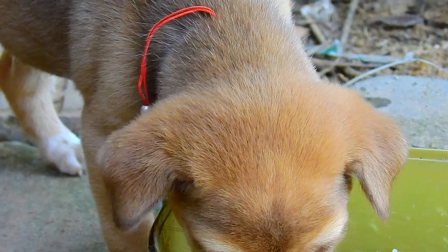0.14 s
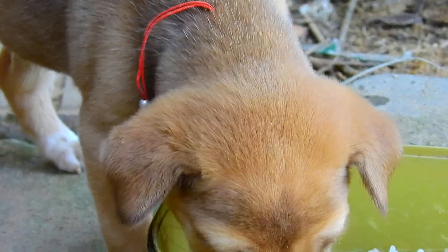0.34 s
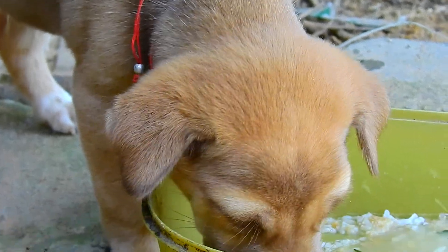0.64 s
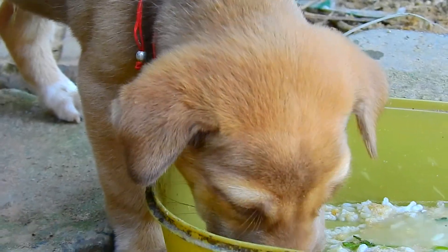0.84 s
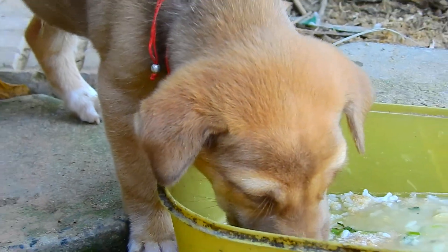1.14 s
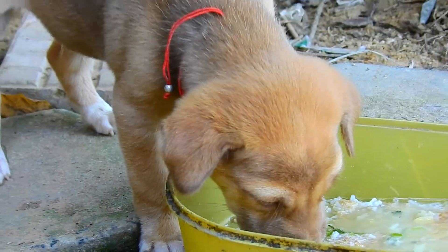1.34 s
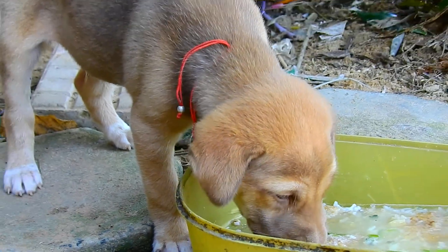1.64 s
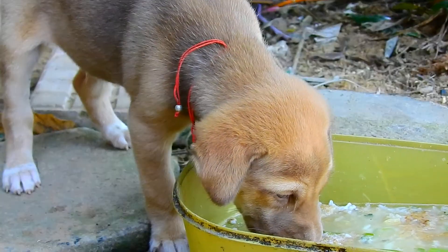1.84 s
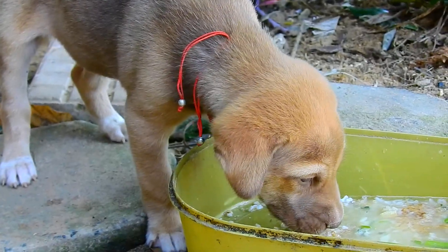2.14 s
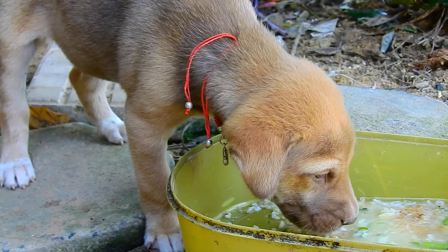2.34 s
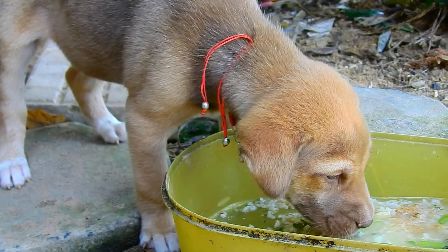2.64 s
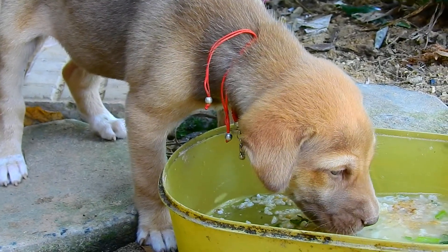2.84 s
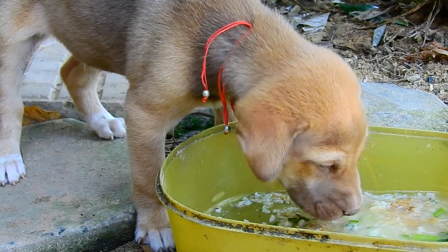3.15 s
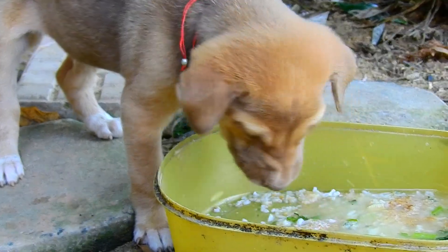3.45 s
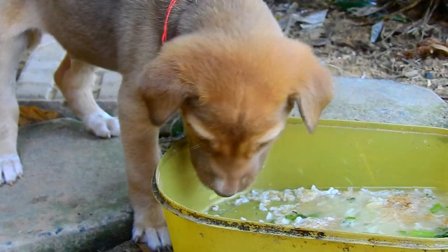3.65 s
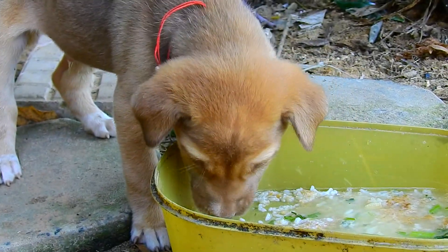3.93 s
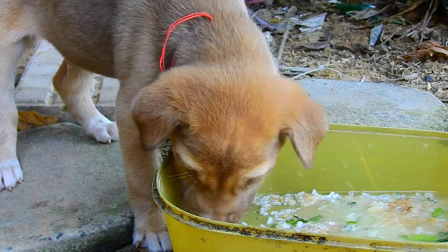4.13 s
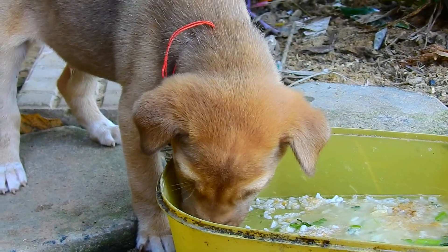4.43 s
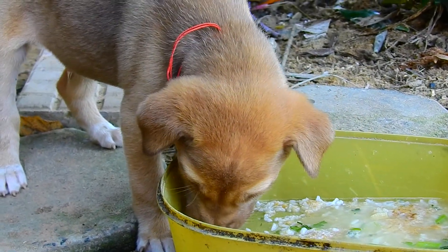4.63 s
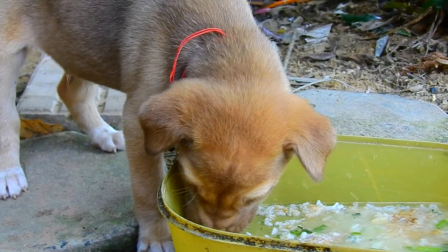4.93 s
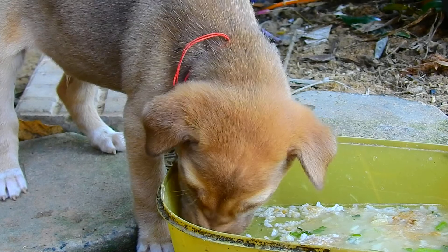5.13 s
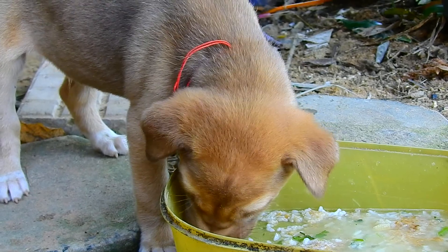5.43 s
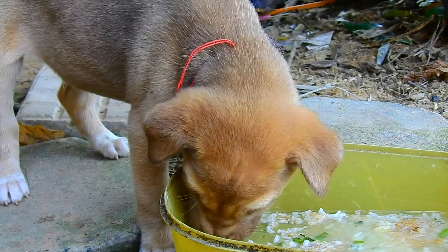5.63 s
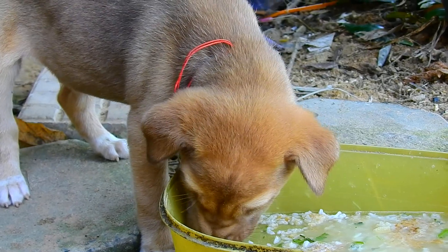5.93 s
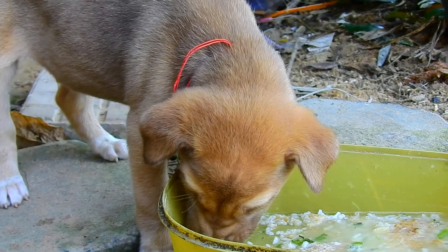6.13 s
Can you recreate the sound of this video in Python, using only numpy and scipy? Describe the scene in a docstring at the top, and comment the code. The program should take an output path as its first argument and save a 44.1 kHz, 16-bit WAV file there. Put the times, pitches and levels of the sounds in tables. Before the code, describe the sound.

Close up, a puppy laps and smacks at watery rice in a plastic tub, with wet slurps, fizzing squirts, scrapes and hollow bumps.

```python
"""A puppy eats watery rice from a plastic tub in a yard: tongue strokes, each a spatter of tiny bubbles
in a resonant hollow, over fizz, slosh and gurgle built from random bursts. Squirts hiss, squeaks and
pops are narrower spatters, lips snap as short rings. The tub rings in decaying modes when pushed, and
rasps and hums when scraped over concrete. Behind lie a far rumble of shaped noise and a wavering tone.
"""
import sys
import numpy as np
from scipy import signal
from scipy.fft import rfft, irfft
from scipy.io import wavfile
from scipy.ndimage import uniform_filter1d

SR = 44100
rng = np.random.default_rng(int(sys.argv[2]) if len(sys.argv) > 2 else 0)


def unload_wav(signal):
    """Save mono or channel-first audio to the path in sys.argv[1] as 16-bit WAV at rate SR, clipped to [-1, 1]."""
    wavfile.write(
        sys.argv[1],
        SR,
        np.round(np.clip(np.atleast_2d(signal).T, -1, 1) * 32767).astype(np.int16),
    )


N = 276948  # samples

# wet rice stirred by the muzzle: time_s, fizz_db, slosh_db, gurgle_db
STIRRING = [(.08, -36, -35.5, -46), (.3, -38, -48, -49.5), (.6, -35, -39.5, -49), (.88, -26, -44, -44.5),
            (1.12, -23, -34.5, -46.5), (1.45, -30, -41, -46.5), (2.0, -36, -48, -48),
            (2.7, -38.5, -50, -51), (2.8, -35, -34.5, -65), (3.14, -32, -35.5, -54),
            (3.3, -35.5, -45, -44.5), (3.76, -35, -37, -46.5), (3.92, -27.5, -34, -54),
            (4.14, -28.5, -38, -44.5), (4.25, -21, -25, -41), (4.42, -22.5, -39, -42.5),
            (4.75, -33.5, -44.5, -53), (5.05, -37, -42.5, -47.5), (5.8, -39.5, -44.5, -52),
            (5.97, -28, -34, -33), (6.15, -35.5, -39.5, -43), (6.28, -32, -38, -47)]
# fine bubbles through the microphone port: freq_hz, density_db (per Hz, relative)
FIZZ_SPECTRUM = [(2060, -28), (3500, -17.5), (3940, -14), (5520, -7), (6660, 0), (7450, -3), (9630, -18.5),
                 (15600, -43)]
# coarse bubbles: freq_hz, density_db (per Hz, relative)
SLOSH_SPECTRUM = [(300, -10.5), (800, -3.5), (1500, -1.5), (2500, 2.5), (3800, 3), (5000, 2.5), (7000, -22),
                  (15000, -70)]
# hissing squirts of water between the teeth: start_s, level_db (before dulling), length_s
SQUIRTS = [(0.098, -37.5, 0.16), (0.274, -30.5, 0.018), (0.528, -33.5, 0.018), (0.684, -27.5, 0.042),
           (0.847, -28, .047), (0.927, -29, 0.051), (1.126, -31, 0.087), (1.538, -27, 0.026),
           (1.63, -59, 0.033), (1.73, -34, 0.11), (1.91, -20.5, 0.047), (2.046, -27, 0.08),
           (2.115, -34.5, 0.065), (2.221, -25.5, 0.061), (2.387, -40, .04), (2.486, -48, 0.025),
           (2.586, -42, .05), (3.336, -26, .035), (3.502, -30.5, 0.027), (3.635, -28, 0.024),
           (3.899, -20, 0.044), (3.965, -21.5, 0.027), (4.051, -20, 0.042), (4.155, -32, 0.045),
           (4.232, -24, .029), (4.285, -21.5, 0.02), (4.413, -28.5, .037), (4.48, -24, 0.054),
           (4.57, -27, 0.056), (4.725, -31, 0.043), (4.842, -24, 0.022), (5.119, -32.5, 0.1),
           (5.255, -29, 0.12), (5.45, -28.5, 0.049), (5.483, -24, 0.042), (5.548, -24.5, 0.035),
           (5.664, -32.5, 0.092), (5.774, -34, 0.013)]
# far rumble: freq_hz, density_db (per Hz, relative)
YARD_SPECTRUM = [(12, -44), (20, -20), (69, 3), (135, 4), (166, 2), (264, -16.5), (318, -26), (484, -21.5),
                 (561, -13), (768, -25.5), (988, -16), (1930, -23), (3000, -16.5), (3900, -44),
                 (6600, -120)]
# tongue strokes: start_s, level_db, mouth_resonance_hz, length_s,
# resonance_glide_factor (above 1 rises, below 1 falls)
TONGUE_STROKES = [(0.088, -32, 1950, 0.04, 1.1), (0.664, -23, 2630, 0.051, 1.1),
                  (0.763, -18.5, 3580, 0.054, 1.1), (0.842, -23.5, 2430, 0.077, 1.2),
                  (1.066, -21.5, 2650, 0.049, 1.3), (1.201, -20.5, 4330, 0.061, 9.8),
                  (1.322, -16.5, 4330, 0.024, 1.1), (1.483, -29, 2310, 0.039, 1),
                  (1.582, -29, 4470, 0.043, 1.4), (1.6194, -15, 3040, 0.042, 0.99),
                  (1.756, -18.5, 2360, 0.028, 1.1), (1.779, -23, 4400, 0.035, 0.97),
                  (1.895, -28, 3500, 0.036, 2.1), (2.029, -29, 3180, 0.04, 1.3),
                  (2.216, -21.5, 2620, 0.06, 1.85), (2.365, -27.5, 2520, 0.022, 0.91),
                  (2.476, -25, 2770, 0.029, 3), (2.578, -27, 2060, 0.048, 4.1),
                  (2.77, -35, 3800, 0.043, 1.4), (2.893, -23, 4570, 0.044, 1.4),
                  (3.312, -30, 2300, 0.058, 0.95), (3.488, -24.5, 2960, 0.024, 2.1),
                  (3.612, -27, 3350, 0.035, 1.8), (3.641, -23.5, 2440, 0.038, 1.8),
                  (3.811, -28, 1850, 0.11, 1.6), (3.856, -19, 3720, 0.062, 1.4),
                  (3.93, -27, 2420, 0.043, 0.98), (3.979, -16, 2960, 0.022, 2), (4.185, -18, 3920, 0.05, 2),
                  (4.831, -20, 3750, 0.039, 2.1), (4.846, -11.5, 4970, 0.045, 1.3),
                  (5.026, -38, 4070, 0.022, 1.1), (5.111, -23.5, 3670, 0.056, 0.67),
                  (5.5, -38, 3960, 0.04, 1), (5.67, -30, 1840, 0.091, 1.1), (5.888, -26.5, 2700, 0.02, 1.3),
                  (5.965, -31, 1580, 0.03, 1.3), (6.059, -25.5, 2580, 0.019, 1.2)]
# tub scraped over concrete: start_s, hold_s, rasp_db, drone_db
SCRAPES = [(0.104, 0.026, -56, -38), (2.379, 0.021, -69, -31.5), (2.454, 0.042, -50, -36.5),
           (2.737, 0.027, -32, -46), (2.8, 0.04, -37.5, -41), (2.859, 0.075, -30.5, -39),
           (2.973, 0.069, -29.5, -30), (3.084, 0.055, -44, -40), (4.19, 0.11, -49, -61),
           (5.26, 0.035, -39.5, -52), (5.456, 0.021, -42.5, -33.5), (5.875, 0.054, -32.5, -34.5),
           (5.926, 0.036, -28.5, -32), (6.032, 0.009, -28.5, -40), (6.065, 0.01, -39.5, -27),
           (6.107, 0.036, -37.5, -35), (6.175, .04, -35.5, -37)]
# tub modes: freq_hz, level_db, t60_s (at damping 1)
TUB_MODES = [(176, -8.5, 0.065), (281, -19, 0.081), (376, -12, 0.054), (471, -22, 0.1), (695, -21, 0.05),
             (970, -25, 0.06)]
# rim on concrete: freq_hz, density_db (per Hz, relative)
GRIT_SPECTRUM = [(150, -15), (350, 3), (800, -1.5), (1600, -6.5), (3500, -38), (8000, -16), (15000, -85)]
# longer, narrower wet squeaks: start_s, level_db, pitch_hz, length_s, glide_factor
SQUEAKS = [(.124, -36.5, 1116, 0.041, 0.97), (.73, -37, 590, 0.025, 1.25), (2.489, -43.5, 930, 0.16, 0.91),
           (3.08, -36, 1400, 0.062, 0.84), (3.2495, -41, 2420, 0.053, 0.9), (3.344, -37, 746, .035, 0.61),
           (3.385, -35, 516, 0.037, 1.26), (3.412, -37.5, 1390, 0.02, 0.96),
           (3.434, -33.5, 900, 0.031, 1.27), (3.483, -42, 1000, 0.041, 0.89), (3.595, -37, 860, .03, 1.02),
           (3.765, -36, 680, .026, 1.37), (3.839, -31, 650, 0.017, 0.88), (4.23, -34.5, 539, 0.074, 1.05),
           (4.35, -35, 560, 0.042, 1.02), (4.907, -34.5, 1540, 0.019, 1.1), (5.4735, -38, 3920, 0.11, 1.02),
           (5.647, -39, 1420, .036, 1.07), (5.6544, -35, 2470, .036, 1.1), (6.1923, -36, 2130, 0.041, 1.06)]
# bubbles and smacks: start_s, level_db, pitch_hz, length_s
POPS = [(0.278, -25, 1110, 0.009), (0.345, -27.5, 2170, 0.013), (0.386, -34, 2300, 0.032),
        (1.651, -30, 920, 0.015), (1.809, -29, 1040, 0.012), (1.869, -25.5, 1030, 0.018),
        (1.916, -27, 900, 0.016), (1.919, -26.5, 905, 0.024), (2.216, -28, 1010, 0.013),
        (2.573, -29, 2180, 0.018), (2.673, -27.5, 1040, 0.0073), (3.563, -28, 945, 0.021),
        (3.625, -23.5, 910, 0.027), (3.722, -18.5, 1420, 0.018), (3.822, -23, 1310, 0.013),
        (3.884, -25, 1520, 0.014), (4.634, -29.5, 1080, 0.013), (4.721, -29.5, 1070, 0.014),
        (4.836, -27, 1330, 0.0098), (4.961, -30, 1260, 0.0056), (5.2, -27.5, 1220, 0.0091),
        (5.234, -25, 1410, 0.014), (5.53, -31, 1310, 0.019), (5.69, -30.5, 1220, 0.029),
        (5.967, -23, 1330, 0.009), (6.028, -17, 1180, 0.0075), (6.046, -25, 784, 0.016),
        (6.148, -25, 1230, 0.0086)]
# low turns of the far tone: time_s, pitch_hz, level_db
WHISTLE_DIPS = [(.86, 945, -56), (1.085, 915, -40), (1.315, 925, -42), (1.52, 920, -40), (1.67, 922, -43),
                (1.82, 885, -62)]
# pushes against the tub: start_s, level_db, damping_factor
BUMPS = [(0.868, -15.5, 4.8), (1.984, -18.5, 1.4), (2.391, -34, 0.97), (2.461, -17.5, 0.51),
         (2.755, -23, 1.1), (2.895, -18, 0.59), (2.977, -13, .71), (3.02, -8.5, 1.2), (3.043, -6, 1.6),
         (4.127, -27.5, 1.5), (4.362, -25, 0.91), (5.272, -15.5, 2.1), (5.89, -19, 1.1), (6.06, -1, 0.53),
         (6.185, -12, 1.5), (6.208, -14, 2.5)]
# lip snaps: start_s, level_db, pitch_hz
LIP_SNAPS = [(1.628, -24, 3400), (3.722, -22, 5000), (4.2724, -19, 6600), (4.2921, -16, 6600),
             (4.9154, -15.5, 3520), (4.9247, -16, 4200), (5.2829, -13, 6400), (5.292, -14, 4170),
             (5.3026, -9.5, 5770)]
# likeness of the two ports: freq_hz, correlation (0 to 1)
PORT_LIKENESS = [(30, .68), (60, .86), (130, .985), (300, .96), (700, .87), (1500, .83), (3100, .74),
                 (6800, .44), (10000, .3), (15000, .5)]
# phase by which the left port leads: freq_hz, lead_rad
PORT_LEAD = [(0, 0), (1000, .05), (5000, .3), (7750, .8), (9650, 2.6), (11300, 3.1), (15300, 3.8)]
# left over right: freq_hz, balance_db
PORT_BALANCE = [(60, -0.5), (250, -1.4), (1000, 1), (4000, .6), (9000, -0.4)]

WAKE_FIZZ_DB, WAKE_SLOSH_DB = -26.5, -22.5  # re stroke level
WAKE_RISE_S, WAKE_LENGTH_S = 0.014, 0.048
WAKE_SLOSH_DB_PER_OCTAVE = -13.5  # high mouth resonances slosh less; 0 dB at 2500 Hz
SQUIRT_TOP_HZ, SQUIRT_RISE_S = 9200, 0.002  # duller than the fizz
YARD_DB = -39.5
STROKE_CREST_DB, POP_CREST_DB, SQUEAK_CREST_DB = 12, 10, 3  # nominal peak over mean
SCRAPE_RISE_S, SCRAPE_FALL_S = 0.01, 0.032
WHISTLE_LIFT_HZ, WHISTLE_FADE_DB = 40, -5  # climbs and fades between dips
SNAP_RISE_S, SNAP_DECAY_S = 0.0001, 0.0003
START_S, START_RAMP_S = 0.07, 0.011
BAND_EDGE_HZ = 15600


def gain_of(db):
    """Decibels to amplitude gain."""
    return 10 ** (np.asarray(db) / 20)


def evened(x):
    """Scales to rms 1."""
    return x / np.sqrt(np.mean(x ** 2) + 1e-20)


def smoothed(x, width):
    """Two running means, width in samples."""
    return uniform_filter1d(uniform_filter1d(x, width), width)


def read(points, hz):
    """Interpolates a table on a log-frequency axis."""
    table_hz, value = np.transpose(points)
    return np.interp(np.log(hz + 1), np.log(table_hz + 1), value)


def add(mix, start_s, sound):
    """Adds a sound in place, cut at the end of the mix."""
    part = mix[..., round(start_s * SR):][..., :sound.shape[-1]]
    part += sound[..., :part.shape[-1]]


def coloured(x, spectrum):
    """Filters x by a spectrum table, rms 1."""
    gain = gain_of(read(spectrum, np.fft.rfftfreq(len(x), 1 / SR)))
    return evened(irfft(rfft(x) * gain, len(x)))


def resonate(x, hz, width_hz):
    """Moving resonance of gain 1: shifts hz down to zero, smooths, shifts back."""
    turn = np.exp(2j * np.pi * np.cumsum(hz * np.ones(len(x))) / SR)
    pole = np.exp(-np.pi * width_hz / SR)
    baseband = signal.lfilter([1 - pole], [1, -pole], x / turn + 1e-18)
    return 2 * (turn * baseband).real


def crackle(count, per_s, spread_db, clump_db, clump_s):
    """Random impulses of uneven size that come in clumps, rms 1."""
    size = gain_of(spread_db * np.minimum(rng.exponential(1, count), 4)) * rng.choice([-1., 1.], count)
    clumps = evened(smoothed(rng.standard_normal(count), max(round(clump_s * SR), 1)))
    struck = rng.random(count) < per_s / SR
    return evened(size * struck * gain_of(clump_db * clumps))


def burst(length_s, rise_s):
    """Time axis and envelope: quick rise, slower fall, peak 1."""
    t = np.arange(round(4 * length_s * SR) + 64) / SR
    shape = (1 - np.exp(-t / rise_s)) * np.exp(-(t / length_s) ** 2.47)
    return t, shape / shape.max()


def spatters(rows, per_s, rise_s, width_share, glide=None):
    """Bursts of tiny bubbles, each in a hollow whose resonance glides by a factor."""
    out = np.zeros(N)
    for start_s, level_db, hz, length_s, *own_glide in rows:
        t, shape = (part[:8192] for part in burst(length_s, rise_s))
        spatter = crackle(8192, per_s, 3.0, 0.61, 0.0011)[:len(t)]
        spatter[round(rise_s * SR)] += 12  # a stronger impulse marks the onset
        factor = glide or own_glide[0]
        centre_hz = np.clip(hz * factor ** (t / length_s - 0.5), 300, 9000)
        width_hz = width_share * hz
        once = resonate(spatter, centre_hz, width_hz)
        twice = evened(resonate(once, centre_hz, width_hz))
        add(out, start_s, gain_of(level_db) * shape * twice)
    return out


def stirred(column, wake_db=None, tilt_db=0):
    """Gain of one bubble layer: slow stirring, plus a wake per tongue stroke if wake_db is given."""
    rows = np.array(STIRRING)
    level = gain_of(np.interp(np.arange(N) / SR, rows[:, 0], rows[:, column]))
    wake = burst(WAKE_LENGTH_S, WAKE_RISE_S)[1]
    for start_s, level_db, hz, *_ in TONGUE_STROKES if wake_db else []:
        tilt = tilt_db * np.log2(hz / 2500)
        add(level, start_s, gain_of(level_db + wake_db + tilt) * wake)
    return level


def patchy(x, patch_db):
    """Random gain patches over frequency and time make the noise uneven, rms 1."""
    z = signal.stft(x, nperseg=512, noverlap=384)[2]
    patches = rng.standard_normal(z.shape[::-1]).T
    patches = uniform_filter1d(patches, size=3, axis=0)  # over frequency
    patches = evened(uniform_filter1d(patches, size=12, axis=1))  # over time
    return evened(signal.istft(z * gain_of(patch_db * patches), nperseg=512, noverlap=384)[1][:N])


def fizz_and_slosh():
    """Fine and coarse bubbles follow the stirring; squirts are a dulled swell of the fine ones."""
    fine_level = stirred(column=1, wake_db=WAKE_FIZZ_DB)
    coarse_level = stirred(column=2, wake_db=WAKE_SLOSH_DB, tilt_db=WAKE_SLOSH_DB_PER_OCTAVE)
    squirt_level = np.zeros(N)
    for start_s, level_db, length_s in SQUIRTS:
        add(squirt_level, start_s, gain_of(level_db) * burst(length_s, SQUIRT_RISE_S)[1])
    low = crackle(N, 14000, 3.4, 1.64, 0.022)
    high = crackle(N, 14000, 0.6, 3.1, 0.021)
    top = signal.butter(4, 8000, "high", fs=SR, output="sos")
    blend = low + signal.sosfiltfilt(top, high - low)  # the finest bubbles clump on their own
    fine = patchy(coloured(blend, FIZZ_SPECTRUM), 2.6)
    coarse = patchy(coloured(crackle(N, 7000, 1.9, 1.2, 0.015), SLOSH_SPECTRUM), 3.9)
    dull = signal.sosfiltfilt(signal.butter(1, SQUIRT_TOP_HZ, fs=SR, output="sos"), fine)
    return fine * fine_level + dull * squirt_level + coarse * coarse_level


def gurgle():
    """Random bubbles ring for a few cycles with rising pitch, large ones low, small ones high."""
    out = np.zeros(N)
    for hz in np.geomspace(280, 2200, 14):
        cycles = hz * np.arange(2000) / SR
        tone = np.sin(2 * np.pi * cycles * (1 + 0.01245 * cycles))
        bubble = tone * np.exp(-cycles / 5.2) * (1 - np.exp(-cycles / 0.067))
        strikes = crackle(N, 40, 3.0, 2.5, 0.02)
        out += (hz / 600) ** 0.3 * signal.oaconvolve(strikes, bubble)[:N]
    return stirred(column=3) * evened(out)


def yard():
    """Far low rumble: shaped noise that swells a little."""
    swell = evened(smoothed(rng.standard_normal(N), 4000))
    return gain_of(YARD_DB + 0.55 * swell) * coloured(rng.standard_normal(N), YARD_SPECTRUM)


def tongue_strokes():
    """Wide-band spatters in the mouth resonance."""
    return gain_of(-STROKE_CREST_DB) * spatters(TONGUE_STROKES, 6000, 0.0026, 0.37)


def scraping():
    """Gains of rasp and drone: each shove rises, holds and dies away."""
    out = np.zeros((2, N))
    for start_s, hold_s, rasp_db, drone_db in SCRAPES:
        t = np.arange(0, SCRAPE_RISE_S + hold_s + 4 * SCRAPE_FALL_S, 1 / SR)
        rise = np.minimum(t / SCRAPE_RISE_S, 1) ** 2
        fall = np.exp(-(np.maximum(t - SCRAPE_RISE_S - hold_s, 0) / SCRAPE_FALL_S) ** 2)
        add(out, start_s, gain_of([[rasp_db], [drone_db]]) * rise * fall)
    return out


def ring(damping):
    """Decaying modes of the tub, more or less damped by ground and muzzle."""
    t = np.arange(SR // 4) / SR
    return sum(gain_of(db - 60 * damping * t / t60_s) * np.sin(2 * np.pi * hz * t)
               for hz, db, t60_s in TUB_MODES)


def scrape_rasp():
    """Stick-slip over grit rasps and rings the tub."""
    slips = crackle(N, 1800, 0.39, 1.96, 0.012)
    boom = evened(signal.oaconvolve(np.diff(slips, prepend=0), ring(0.48))[:N])
    grit = coloured(slips, GRIT_SPECTRUM)
    return scraping()[0] * (gain_of(-11) * boom + gain_of(-3) * grit)


def scrape_drone():
    """While it scrapes, the tub hums near its lowest mode with a wavering pitch."""
    waver = evened(smoothed(rng.standard_normal(N), 900))
    pitch_hz = 165 + 4.28 * waver
    return scraping()[1] * np.sqrt(2) * np.sin(2 * np.pi * np.cumsum(pitch_hz) / SR)


def squeaks():
    """Wet squeaks: spatters in a narrow gliding resonance."""
    return gain_of(-SQUEAK_CREST_DB) * spatters(SQUEAKS, 3000, 0.00283, 0.085)


def bubble_pops():
    """Bubbles and smacks: short spatters of slightly rising pitch."""
    return gain_of(-POP_CREST_DB) * spatters(POPS, 2500, 0.00093, 0.3, glide=1.08)


def whistle():
    """A faint far tone wavers, fading as it climbs between dips, and is blurred by the air."""
    dip_s, dip_hz, dip_db = np.transpose(WHISTLE_DIPS)
    t, out = np.arange(dip_s[0], dip_s[-1], 1 / SR), np.zeros(N)
    lift = np.sin(np.pi * np.interp(t, dip_s, np.arange(len(dip_s)))) ** 2  # 0 at dips, 1 midway
    pitch_hz = np.interp(t, dip_s, dip_hz) + WHISTLE_LIFT_HZ * lift
    tone = np.sqrt(2) * np.sin(2 * np.pi * np.cumsum(pitch_hz) / SR)
    blur = evened(resonate(rng.standard_normal(len(t)), pitch_hz, 21))
    level = gain_of(np.interp(t, dip_s, dip_db) + WHISTLE_FADE_DB * lift)
    add(out, dip_s[0], (0.8 * tone + 0.25 * blur) * level * signal.windows.tukey(len(t), 0.1))
    return out


def tub_bumps():
    """Short pushes ring the tub; the deep bass below about 115 Hz is filtered away."""
    out, t = np.zeros(N), np.arange(2000) / SR
    push = t * np.exp(-2 * np.pi * 600 * t)
    for start_s, level_db, damping in BUMPS:
        add(out, start_s, -gain_of(level_db) * signal.oaconvolve(push / push.sum(), ring(damping)))
    return signal.sosfilt(signal.butter(4, 115, "high", fs=SR, output="sos"), out)


def lip_snaps():
    """Bare clicks with a very short ring."""
    out, t = np.zeros(N), np.arange(400) / SR
    shape = np.exp(-t / SNAP_DECAY_S) * (1 - np.exp(-t / SNAP_RISE_S))
    shape /= shape.max()
    for start_s, level_db, hz in LIP_SNAPS:
        add(out, start_s, gain_of(level_db) * shape * np.sin(2 * np.pi * hz * t))
    return out


def ports(common, independent):
    """Two close ports: a shared part with phase lead, an independent draw of opposite sign in each."""
    hz = np.fft.rfftfreq(N, 1 / SR)
    angle = np.arccos(np.clip(read(PORT_LIKENESS, hz), 0, 1)) / 2
    half = np.exp(0.5j * read(PORT_LEAD, hz)) * gain_of(read(PORT_BALANCE, hz) / 2)
    shared = np.cos(angle) * rfft(common)
    apart = np.sin(angle) * rfft(independent)
    return irfft(np.array([(shared + apart) * half, (shared - apart) / half]), N)


def noisy_sources():
    """One random draw of all the noisy sources."""
    mouth = tongue_strokes() + squeaks() + bubble_pops()
    return fizz_and_slosh() + gurgle() + yard() + mouth + scrape_rasp()


def scene():
    """Noisy sources are drawn twice, shared and independent; sharp and tonal ones are only shared."""
    common, independent = noisy_sources(), noisy_sources()
    common += scrape_drone() + whistle() + tub_bumps() + lip_snaps()
    return ports(common, independent)


def record(dry):
    """The sound comes in after a short silence; then the band limit."""
    ramp = np.clip((np.arange(N) / SR - START_S) / START_RAMP_S + 0.5, 0, 1)
    lowpass = signal.firwin(511, BAND_EDGE_HZ, window=("kaiser", 9), fs=SR)
    return signal.oaconvolve(dry * ramp ** 2, lowpass[None], "same")


dry = scene()
out = record(dry)
unload_wav(out)
```